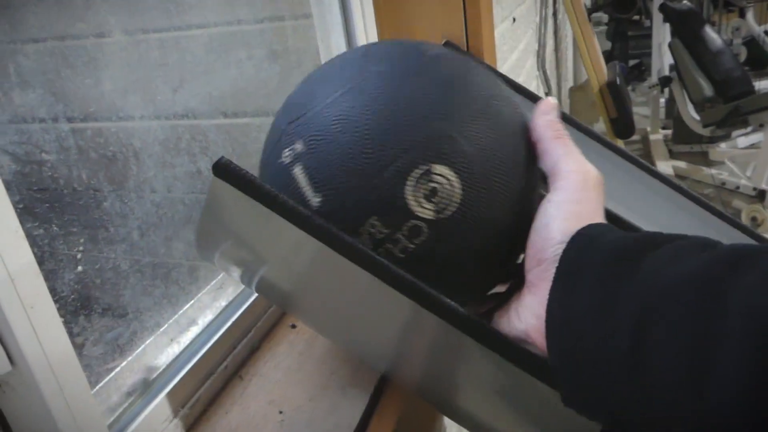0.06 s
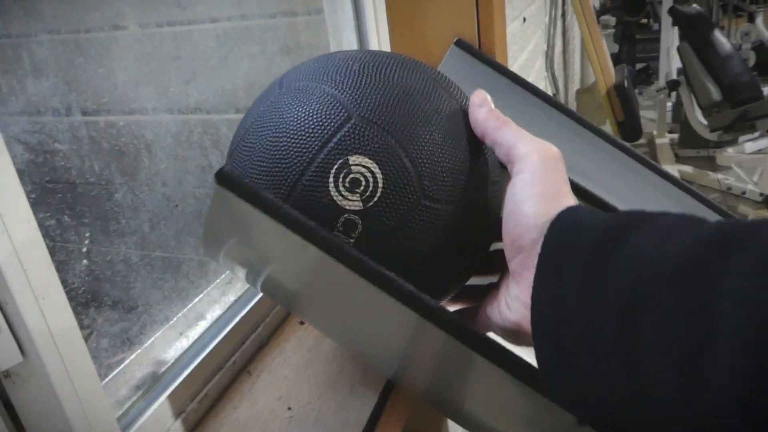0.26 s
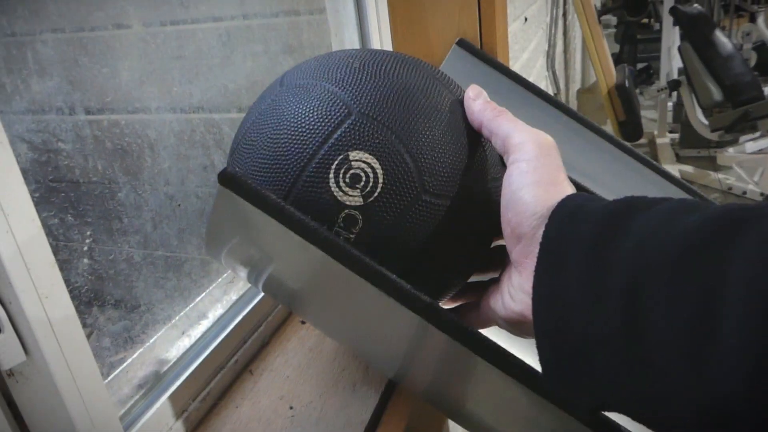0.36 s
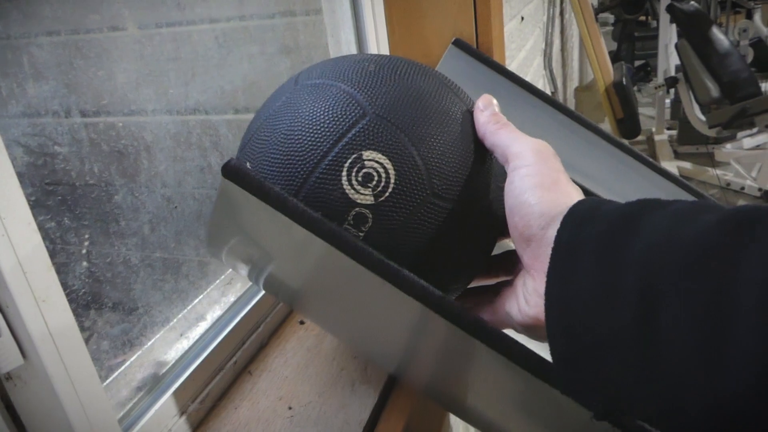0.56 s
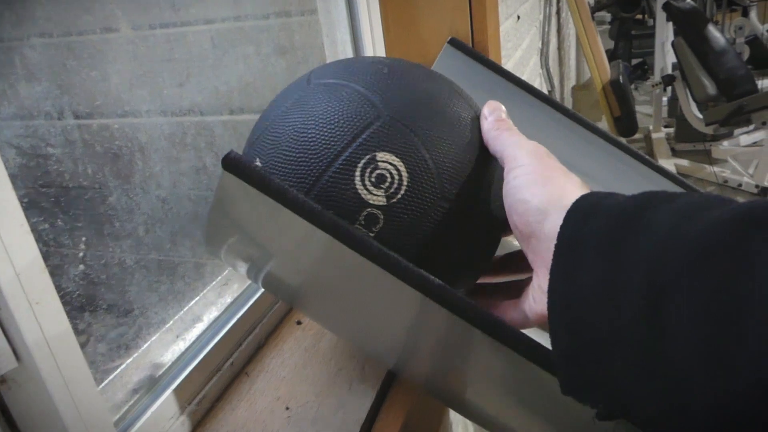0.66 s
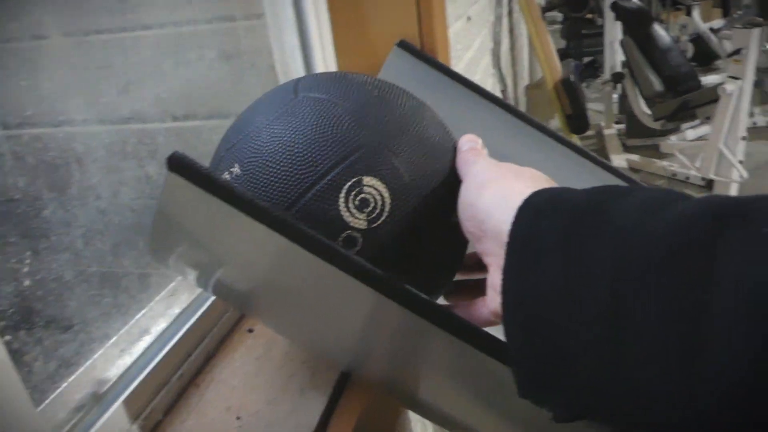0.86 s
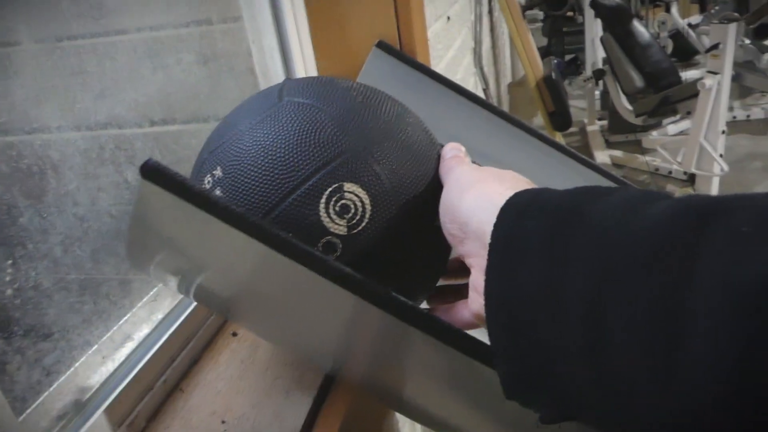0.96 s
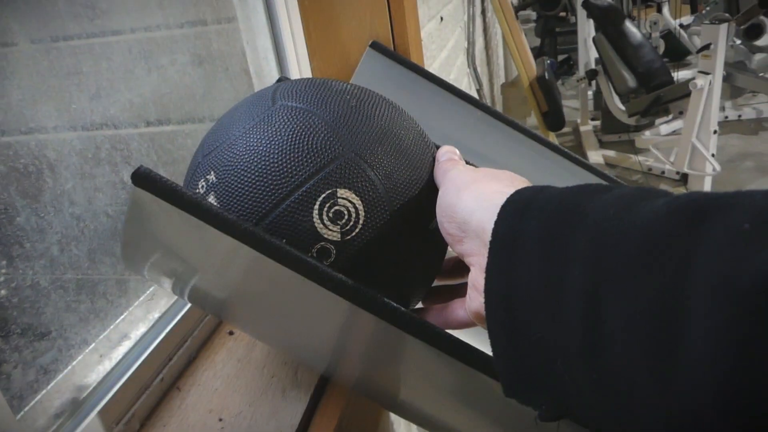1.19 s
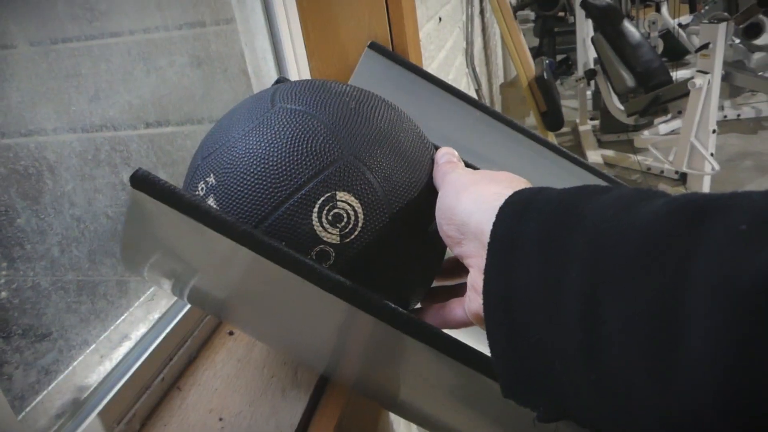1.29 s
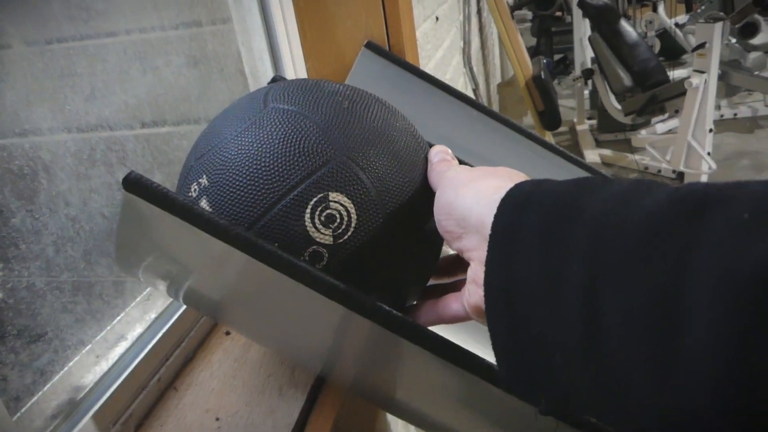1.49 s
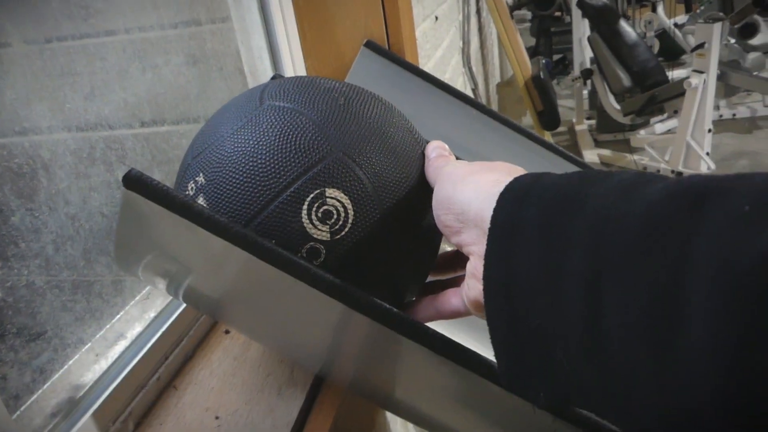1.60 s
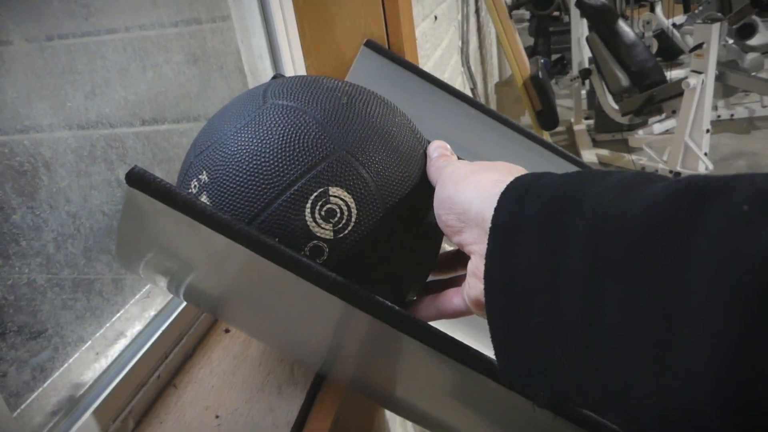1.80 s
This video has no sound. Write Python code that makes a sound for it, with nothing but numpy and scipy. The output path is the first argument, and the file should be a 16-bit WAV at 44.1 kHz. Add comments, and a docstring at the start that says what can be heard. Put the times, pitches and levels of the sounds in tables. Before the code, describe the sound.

A steel rack clatters at about 0.2 seconds as a rubber medicine ball drops in with a thump and a quick cluster of metallic knocks. Two lighter knocks follow around 0.4 and 0.5 seconds, and the ringing fades by about one second. Faint rubber squeaks and sleeve rustles continue until roughly 1.7 seconds, over the soft air noise and low hum of a small gym.

```python
"""A sheet-steel rack clatters as a rubber medicine ball is dropped into it by hand.
The ball grazes a rail and thumps onto the tray; each blow drives beating modes and a dense
sheet ring that carries into a small gym. The rubber squeaks as it settles, a sleeve rustles
and the tray murmurs softly. Behind it all: soft air noise and a low hum."""
import sys
import numpy as np
from scipy import signal
from scipy.fft import rfft, irfft
from scipy.io import wavfile
from scipy.ndimage import uniform_filter1d

SR = 44100
rng = np.random.default_rng(int(sys.argv[2]) if len(sys.argv) > 2 else 0)


def store_pcm(level_fs):
    """Save levels as 16-bit WAV."""
    pcm = np.round(np.clip(level_fs, -1, 1) * 32767).astype(np.int16)
    wavfile.write(sys.argv[1], SR, np.atleast_2d(pcm).T)


N = 81585

# blows on the rack: start_s, clatter_db, tilt_db_per_octave, modes_db, contact_s
RACK_BLOWS = [(.2115, -21.5, 1.3, -21, .0005), (.2285, 0, -.9, -2.5, 0.00027),
              (.2355, -8, 1.5, -13, 0.0026), (0.2466, 1, 0.47, 1, 0.0008), (0.2545, -1.5, 1.5, -2, 0.0035),
              (.272, -3.5, -3.5, -17, 0.0034), (0.297, -2.5, -1, -2.5, 0.00068),
              (0.304, -2, -2.5, -12.5, 0.0015), (0.4107, -10.5, -4.5, -24, 0.0015),
              (.535, -12, -2, -23, 0.015)]
# rack resonances: pitch_hz, relative_db, t60_s, left_minus_right_db
RACK_MODES = [(113.5, -11, 1.5, 0), (202.5, -2.5, .97, 0), (360.3, -6, .76, 0), (468.3, -3.5, .65, 0),
              (525.6, -8, .8, -2.5), (575.3, -2.5, 1.15, -3), (238, -10, .7, 0), (326, -10, .45, 0),
              (700.5, -8, .4, -2), (809.5, -11, .55, 3), (1053, -8, .45, 3), (1192, -18, 1.1, 0),
              (1250, -12, .6, 0), (1657, -13, .4, 1), (1770, -16, .45, 0), (1959, -19, .45, 8),
              (2998, -16, .45, 4), (3306, -20, .4, -3), (4033, -21, .35, -3)]
# sheet ring and its room tail: centre_hz, early_density_db, late_density_db, late_t60_s
SHEET_BANDS = [(29.8, -40, -45, 0.7), (66, -19, -15.5, 1.1), (133, -9, -11, 0.81), (208, 5, -3.5, 1.01),
               (296, -9, -13.5, 0.82), (520, 11, -4, 0.84), (815, -1.5, -12, 0.65), (1570, -7, -24, 1.14),
               (2400, -10.5, -29, 1.36), (3410, -11, -26.5, 0.62), (4070, -19, -28.5, 0.49),
               (10500, -23.5, -41, 1.12), (15500, -36, -47, 1.1)]
# ball body thumps: start_s, length_s, pitch_hz, level_db
BALL_THUMPS = [(.229, 0.017, 210, -32), (.264, 0.016, 225, -19), (.316, 0.0274, 210.6, -31)]
# soft tray murmurs: start_s, attack_s, hold_s, release_s, level_db
TRAY_MURMURS = [(0.025, 0.069, 0.086, .02, -58), (0.687, 0.013, 0.013, 0.035, -50.5),
                (0.79, 0.018, 0.023, 0.076, -55.5), (1.03, 0.0063, 0.011, 0.016, -57.5),
                (1.135, 0.066, 0.35, 0.033, -58), (1.26, 0.0097, 0.013, 0.029, -56),
                (1.44, 0.034, 0.017, 0.06, -66)]
# tray murmur colour: frequency_hz, relative_db
MURMUR_SPECTRUM = [(100, -39), (260, -5.5), (340, -7), (400, -9), (445, 4.5), (490, 4.5), (600, -7.5),
                   (720, -28), (880, -16.5), (1100, -26), (2000, -32)]
# rubber squeaks: start_s, length_s, pitch_hz, level_db
RUBBER_SQUEAKS = [(0.725, 0.047, 1210, -55.5), (.735, 0.017, 987, -54.5), (0.84, 0.049, 1650, -60.5),
                  (0.861, 0.0083, 3080, -52.5), (0.99, 0.012, 1420, -55.5), (0.995, 0.046, 1235, -50.5),
                  (1.03, 0.023, 1020, -55), (1.264, 0.0093, 2800, -64.5), (1.481, 0.0064, 5640, -60),
                  (1.522, 0.06, 1219, -61), (1.634, .055, 1186, -66)]
# sleeve and palm brushing: start_s, attack_s, hold_s, release_s, level_db
SLEEVE_BRUSHES = [(0.418, 0.0049, 0.0023, 0.0047, -36.5), (0.435, 0.0062, .003, .007, -48),
                  (0.521, 0.011, .018, 0.014, -50.5), (0.559, 0.011, 0.095, 0.063, -59.5),
                  (0.707, 0.013, 0.016, 0.048, -61), (0.824, 0.0066, 0.033, 0.043, -57),
                  (0.958, 0.057, 0.014, 0.03, -56)]
# brushing hiss: frequency_hz, relative_db
BRUSH_SPECTRUM = [(500, -42), (2500, -11), (4300, -14.5), (6500, -8.5), (8000, -8), (9900, -1.5),
                  (11500, -8.5), (13500, -8), (15500, -10.5)]
# sleeve sliding on the rail: start_s, attack_s, hold_s, release_s, level_db
SLEEVE_SLIDES = [(1.114, 0.069, 0.081, 0.09, -55), (1.325, 0.043, 0.21, .07, -61)]
# sliding hiss: frequency_hz, relative_db
SLIDE_SPECTRUM = [(200, 5), (900, 3), (1500, -4), (2500, -2.5), (5000, -6.5), (6000, 1), (6500, 6),
                  (7100, -1), (7800, -1.5), (9700, 5), (12000, -1.5), (15500, -7)]
# room air: frequency_hz, relative_db
AIR_SPECTRUM = [(25, -13), (60, -11.5), (120, 5), (180, -3), (340, -6.5), (480, 2), (680, -13.5), (850, -9),
                (1000, -13), (1500, -18.5), (4000, -21), (10000, -20), (15500, -21)]
# stereo width of steel and air: frequency_hz, side_gain
STEREO_SPREAD = [(120, 0.89), (500, 1.42), (1500, 1.44), (12000, 0.63)]

SHEET_WIDTH, ROOM_WIDTH, CLOTH_WIDTH = .34, .46, .44  # side / mid
BINS_HZ = np.fft.rfftfreq(N, 1 / SR)
LEFT_RIGHT = np.array([[1], [-1]])


def rack_modes(gain_db=-30.5, push_s=.003, twin_db=-10, min_split_hz=5.5, in_step_s=.28):
    """Blows add energy to each mode; a weaker twin drifts out of step and beats against it."""
    pushes = [(start_s, undb(db) * (1 - np.exp(-since(start_s) / push_s)))
              for start_s, _, _, db, _ in RACK_BLOWS]
    ring = 0
    for hz, db, t60_s, pan_db in RACK_MODES:
        skew, offset, split = rng.uniform(-.96, 1, 3)
        energy = sum((push * fade(since(start_s), t60_s)) ** 2 for start_s, push in pushes)
        phase = 2 * np.pi * hz * since(0) + .15 * skew * LEFT_RIGHT + np.pi * offset
        split_hz = min_split_hz * (split / 2 + np.sign(split))
        drift = 2 * np.pi * split_hz * since(in_step_s)
        pair = np.sin(phase) + undb(twin_db) * np.sin(phase + drift)
        ring += undb(db + LEFT_RIGHT * pan_db / 2) * np.sqrt(energy) * pair
    return undb(gain_db) * ring


def clatter(gain_db=-13.5, crack_db=-.5, crack_s=.0014, early_t60_s=.11, room_build_s=.012):
    """Each blow cracks, rings the sheet steel and fills the room; powers add per band."""
    bands = np.array(SHEET_BANDS)
    near, far = steel_noise(SHEET_WIDTH), steel_noise(ROOM_WIDTH)
    early_gain, late_gain = undb(curve(bands[:, [0, 1]])), undb(curve(bands[:, [0, 2]]))
    t, out = since(0), np.zeros((2, N))
    early = fade(t, early_t60_s) ** 2 + undb(crack_db) ** 2 * np.exp(-2 * t / crack_s)
    for weights, (centre_hz, _, _, t60_s) in zip(np.eye(len(bands)), bands):
        band = curve(np.c_[bands[:, 0], weights])  # triangular passband
        late = (fade(t, t60_s) * (1 - np.exp(-t / room_build_s))) ** 2
        early_power, late_power = np.zeros((2, N))
        for start_s, db, tilt, _, contact_s in RACK_BLOWS:
            i = int(start_s * SR)
            power = undb(db + tilt * np.log2(centre_hz / 1000)) ** 2
            contact = np.minimum(t / contact_s, 1)
            early_power[i:] += power * (early * contact)[:N - i]
            late_power[i:] += power * late[:N - i]
        out += np.sqrt(early_power) * irfft(near * band * early_gain, N)
        out += np.sqrt(late_power) * irfft(far * band * late_gain, N)
    return undb(gain_db) * out


def steel_noise(width, ripple_db=3, step_hz=25):
    """Stereo spectrum of crowded, uneven resonances, widest in the midrange."""
    grid_hz = np.arange(0, SR / 2, step_hz)
    peaks = np.interp(BINS_HZ, grid_hz, rng.standard_normal(len(grid_hz)))
    ripple = undb(ripple_db * peaks * np.minimum(BINS_HZ / 1000, 1))
    mid, side = rfft(rng.standard_normal((2, N)))
    side *= width * curve(STEREO_SPREAD)
    return ripple * (mid + LEFT_RIGHT * side) / np.hypot(1, width)


def thumps():
    """The heavy rubber body gives a few damped cycles as it squashes on the tray."""
    return sum(undb(db) * arch(start_s, length_s) * np.sin(2 * np.pi * hz * since(start_s))
               for start_s, length_s, hz, db in BALL_THUMPS)


def tray_murmur():
    """The tray murmurs softly as the ball is handled, settles, and a sleeve rubs."""
    return swells(TRAY_MURMURS) * coloured(MURMUR_SPECTRUM, SHEET_WIDTH)


def squeaks(jitter=.04, rasp=.23, overtone_db=-14, room_db=-8, room_t60_s=.5):
    """Rubber sticks and slips at an unsteady pitch; the room adds a tail."""
    direct = 0
    for start_s, length_s, hz, db in RUBBER_SQUEAKS:
        phase = 2 * np.pi * np.cumsum(hz * (1 + jitter * walk(rate_hz=400))) / SR
        envelope = arch(start_s, length_s) * (1 + rasp * walk(rate_hz=600))
        direct += undb(db) * envelope * (np.sin(phase) + undb(overtone_db) * np.sin(2 * phase))
    room = noise(ROOM_WIDTH) * fade(since(0), room_t60_s)
    room /= np.sqrt(np.sum(room ** 2) / 2)
    return direct + undb(room_db) * signal.fftconvolve(room, direct[None], axes=1)[:, :N]


def sleeve(grain_db=1.5):
    """Friction hiss: grainy brushes of cloth and palm, smooth slides along the rail."""
    grain = undb(grain_db * walk(rate_hz=400))
    brush = swells(SLEEVE_BRUSHES) * coloured(BRUSH_SPECTRUM, CLOTH_WIDTH)
    slide = swells(SLEEVE_SLIDES) * coloured(SLIDE_SPECTRUM, CLOTH_WIDTH)
    return grain * brush + slide


def room_tone(air_db=-57, hum_db=-66, hum_hz=120, waver_hz=6.03):
    """Soft, wide air noise and a hum wavering in phase and level."""
    left, right = coloured(AIR_SPECTRUM, width=1)
    side = irfft(rfft(left - right) * curve(STEREO_SPREAD), N)
    air = (left + right + LEFT_RIGHT * side) / 2
    phase = 2 * np.pi * hum_hz * since(0) + .6 * walk(waver_hz)
    hum = np.sqrt(2) * (1 + .25 * walk(waver_hz)) * np.sin(phase)
    return undb(air_db) * air + undb(hum_db) * hum


def undb(db):
    """Decibels to gain."""
    return 10 ** (np.asarray(db) / 20)


def since(start_s):
    """Seconds since start_s, zero before."""
    return np.maximum(np.arange(N) / SR - start_s, 0)


def fade(t, t60_s):
    """Decay of 60 dB per t60_s."""
    return np.exp(-np.log(1000) * t / t60_s)


def arch(start_s, length_s):
    """Half-sine envelope."""
    return np.sin(np.pi * np.minimum(since(start_s) / length_s, 1))


def swells(rows):
    """Summed envelopes: linear attack, hold, exponential release."""
    envelope = 0
    for start_s, attack_s, hold_s, release_s, db in rows:
        rise = np.minimum(since(start_s) / attack_s, 1)
        envelope += undb(db) * rise * np.exp(-since(start_s + attack_s + hold_s) / release_s)
    return envelope


def curve(points):
    """Interpolate (hz, value) points onto the FFT bins in log frequency."""
    hz, values = np.array(points).T
    return np.interp(np.log(BINS_HZ + 1), np.log(hz), values)


def noise(width):
    """Stereo white noise; width = side / mid."""
    mid, side = rng.standard_normal((2, N))
    return (mid + LEFT_RIGHT * width * side) / np.hypot(1, width)


def coloured(spectrum, width):
    """Shaped stereo noise, rms 1."""
    x = irfft(rfft(noise(width)) * undb(curve(spectrum)), N)
    return x / x.std()


def walk(rate_hz):
    """Smooth random wander, standard deviation 1."""
    step = max(int(SR / rate_hz), 1)
    x = uniform_filter1d(np.repeat(rng.standard_normal(N // step + 1), step), step)[:N]
    return x / x.std()


def scene(pan_db=.85):
    """Rack slightly left, plus friction sounds and room tone."""
    rack = (rack_modes() + clatter() + thumps()) * undb(LEFT_RIGHT * pan_db / 2)
    return rack + sleeve() + tray_murmur() + squeaks() + room_tone()


def record(dry):
    """Cut the deep bass and the top treble."""
    low_hz, top_hz = 34, 15800
    highpass = signal.butter(3, low_hz, "high", fs=SR, output="sos")
    lowpass = signal.ellip(10, .2, 70, top_hz, fs=SR, output="sos")
    return signal.sosfilt(lowpass, signal.sosfilt(highpass, dry))


dry = scene()
out = record(dry)
store_pcm(out)
```